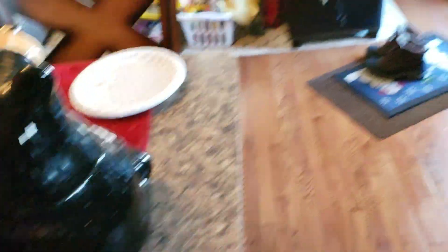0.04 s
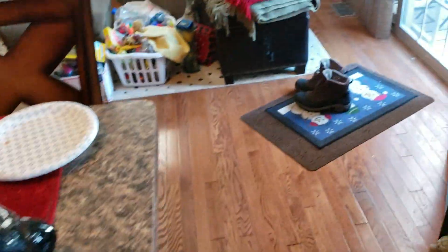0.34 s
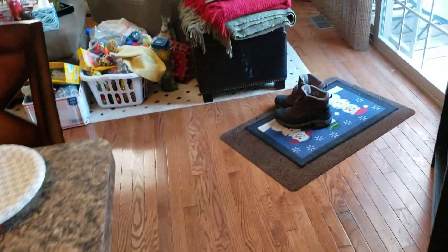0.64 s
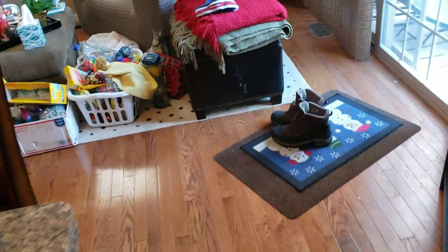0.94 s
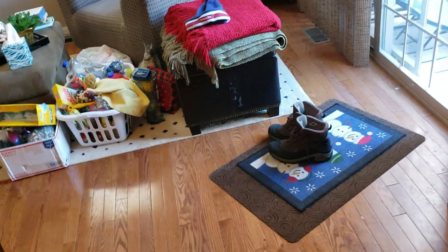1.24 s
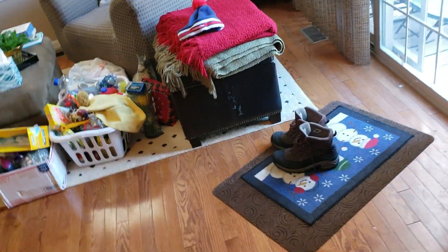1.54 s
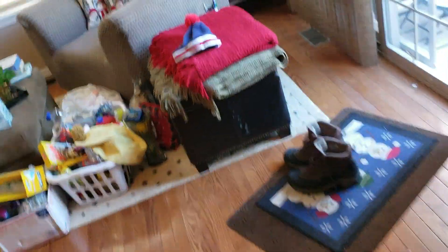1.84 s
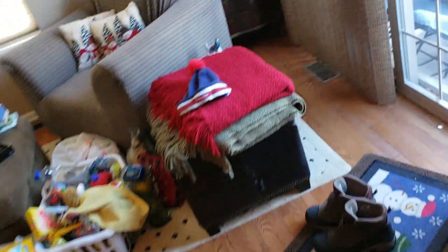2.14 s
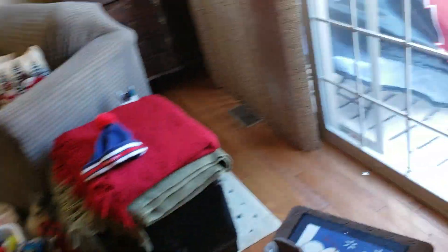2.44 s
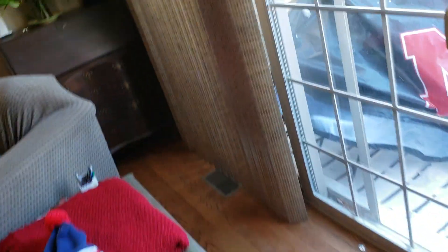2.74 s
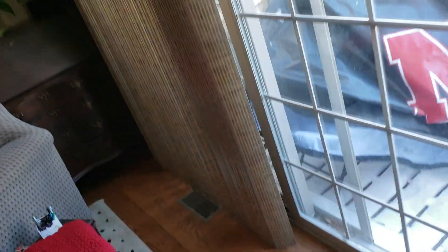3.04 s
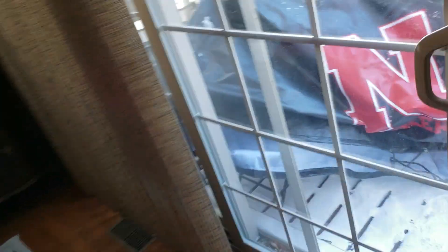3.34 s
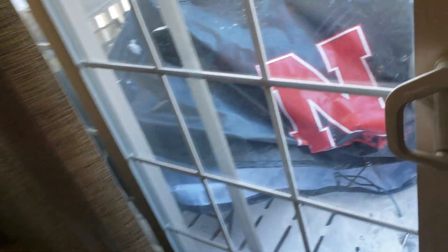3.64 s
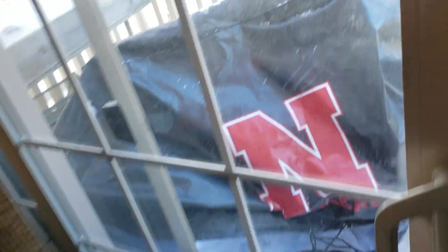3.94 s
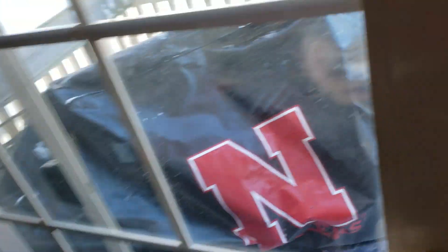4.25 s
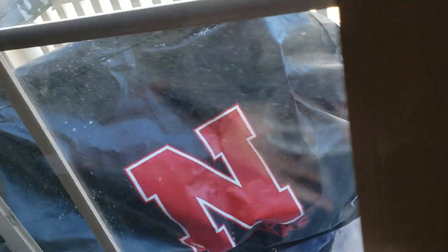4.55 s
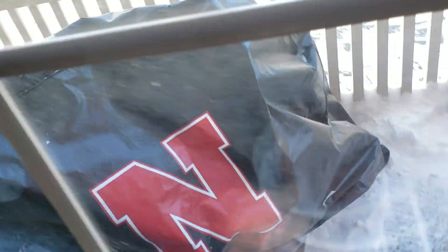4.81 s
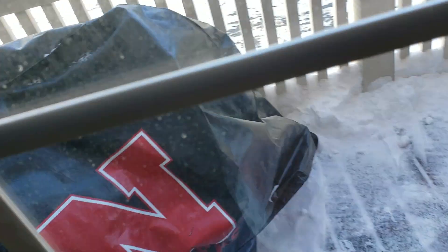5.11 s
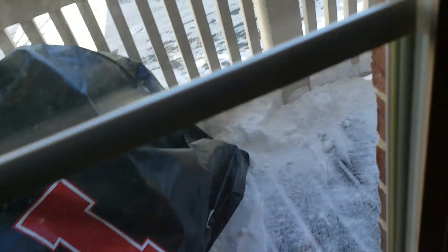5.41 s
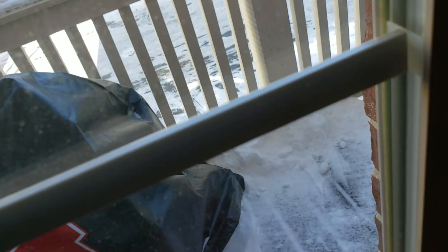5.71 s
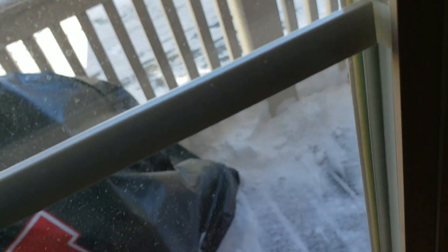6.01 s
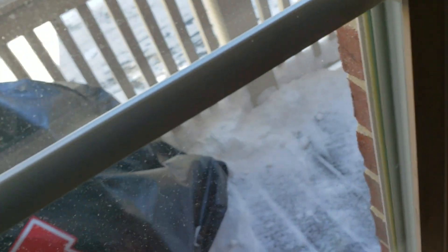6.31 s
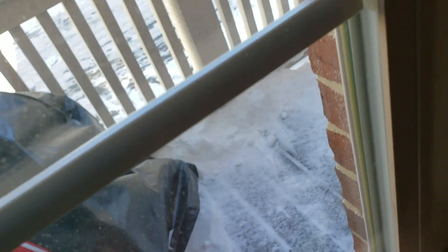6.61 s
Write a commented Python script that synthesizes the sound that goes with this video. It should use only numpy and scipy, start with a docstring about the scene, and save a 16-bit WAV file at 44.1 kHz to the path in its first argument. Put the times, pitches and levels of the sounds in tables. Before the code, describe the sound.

Someone walks over thumping floorboards in swishing clothes, tugs at a sliding glass door and opens it with a loud, stuttering rubber squeal.

```python
"""Opening a glass patio door

Someone in rustling clothes walks over a wooden kitchen floor, and the boards thump and knock.
At the door the latch clacks and scrapes, and after a few tugs the rollers start to rumble.
Close by on the left, the rubber weather seal sticks and slips along the frame: slow slips
judder, fast ones squeal."""
import sys
import numpy as np
from scipy import signal
from scipy.fft import rfft, irfft, next_fast_len
from scipy.io import wavfile
from scipy.ndimage import map_coordinates

SR = 44100
rng = np.random.default_rng(int(sys.argv[2]) if len(sys.argv) > 2 else 0)


def bounce(signal):
    """Save signal as a 16-bit WAV file at the path given by the first command-line argument."""
    frames = np.transpose(np.atleast_2d(signal))
    limited = np.clip(frames, -1, 1)
    pcm = np.round(limited * 32767).astype(np.int16)
    wavfile.write(sys.argv[1], SR, pcm)


N = 302922
TIME = np.arange(N) / SR
AGE = np.arange(SR // 2) / SR  # seconds since a short sound began

# how alike the left and right sides are: (frequency [Hz], likeness [0 to 1])
LIKENESS = [(60, 0.85), (250, 0.92), (700, 0.36), (1500, 0.017), (15000, 0.018)]
# the kitchen's echo: (frequency [Hz], time to fade by 60 dB [s])
ECHO_TIMES = [(80, 0.43), (400, 0.29), (2000, 0.27), (6000, 0.13), (15000, 0.13)]
# tone of the quiet house: (frequency [Hz], level [dB])
AIR_TONE = [(20, -9), (100, -6), (220, -19), (550, -25.5), (1000, -28), (2400, -27), (4800, -29.5),
            (7500, -32), (16000, -28.5)]

# fabric sliding on fabric: (peak time [s], length [s], swish [dB], hiss [dB], weave pitch [Hz])
FABRIC_STROKES = [(0.01, 0.2, -54, -61, 3990), (0.179, 0.11, -51.5, -61, 3830),
                  (0.285, 0.038, -43, -57.5, 3870), (0.37, 0.39, -63.5, -64.5, 4200),
                  (0.493, 0.1, -58.5, -69, 3480), (0.681, 0.11, -48, -60.5, 3700),
                  (0.83, 0.31, -62.5, -66, 4160), (0.96, 0.24, -54, -62, 3700),
                  (1.063, 0.13, -52.5, -60.5, 3750), (1.236, 0.13, -55, -67.5, 4250),
                  (1.469, 0.37, -88, -70, 4120), (1.727, 0.19, -67, -76.5, 4040),
                  (1.835, .24, -63.5, -72.5, 4430), (2.008, 0.28, -56, -66, 4630),
                  (2.089, 0.17, -64, -71, 4300), (2.43, 0.13, -60, -78, 3890),
                  (2.518, 0.15, -57, -75, 3740), (2.627, 0.25, -56, -67.5, 3850),
                  (2.821, 0.32, -59.5, -68, 3720), (3.194, 0.32, -67, -70.5, 3800),
                  (3.337, 0.37, -71.5, -69, 4500), (3.882, 0.27, -69.5, -72, 3760),
                  (4.066, 0.2, -79, -69.5, 4020), (5.07, 0.26, -70.5, -77, 3800),
                  (5.27, 0.37, -74.5, -72.5, 4600), (5.391, 0.36, -69, -66.5, 4510)]
# light brushing of the clothes between strokes: (time [s], level [dB])
BRUSH_LEVELS = [(0, -72.5), (1.4, -74), (1.68, -87), (2.35, -88), (2.95, -77), (3.3, -73), (3.6, -106),
                (5.5, -88)]
# tones of firmly and of lightly rubbed fabric: (frequency [Hz], level [dB])
SWISH_TONE = [(410, -43), (700, -29), (1080, -10.5), (2040, -1), (2220, -3), (3090, -2.5), (3870, 0.5),
              (5390, -3.5), (7590, -2.5), (9000, -42), (11700, -21), (19800, -120)]
HISS_TONE = [(350, -18), (600, -12), (1030, -6), (1330, -5), (2680, -20), (3160, -32), (4580, 0.5),
             (5710, -3.5), (7210, 3), (8620, -1), (14700, 2.5), (16000, -16.5)]

# heels and soles landing: (time [s], level [dB], thump pitch [Hz], treble cut-off [Hz])
STEPS = [(0.242, -58.5, 129.2, 453), (0.736, -50, 105.3, 606), (0.77, -53, 101.1, 450),
         (0.861, -48, 97, 910), (0.918, -41.5, 97, 2500), (1.885, -42.5, 117.5, 2400),
         (1.903, -42.5, 81.5, 600), (1.974, -45.5, 48, 2300), (2.636, -45.5, 110.3, 900),
         (2.698, -46.5, 56, 924), (2.75, -44, 53, 600), (3.274, -53, 128.3, 304), (3.341, -51.5, 48.7, 258),
         (3.528, -60, 99, 300), (3.85, -41, 92.8, 373), (3.937, -51, 81.8, 258), (4.002, -53.5, 80, 494),
         (4.738, -43, 93.4, 343)]
# tone of a knock on the floor or door: (frequency [Hz], level [dB])
KNOCK_TONE = [(30, -16.5), (60, -10), (110, 1), (165, 3.5), (255, -2), (380, -1), (520, -8.5), (700, -7.5),
              (1000, -14), (1800, -12.5), (3000, -12), (4500, -39)]
# small clicks of handled things and of the seal: (time [s], level [dB])
TICK_HITS = [(0.2776, -32.5), (0.28, -33.5), (0.282, -44), (0.288, -32), (0.5, -36.5), (0.653, -39),
             (1.191, -52), (6.171, -39), (6.2819, -14.5), (6.542, -11)]
# tone of those clicks: (frequency [Hz], level [dB])
TICK_TONE = [(300, -14), (900, -12.5), (1200, 5), (1600, -6.5), (3000, 0.5), (4000, -13), (5500, 0.5),
             (10000, -5.5), (16000, -5.5)]
# hard hits of boards, latch and door: (time [s], level [dB], pitch [Hz], time to fade by 60 dB [s])
CLACK_HITS = [(0.739, -39, 880, 0.039), (0.766, -48, 980, 0.024), (0.858, -42, 500, 0.038),
              (0.924, -25.5, 1130, 0.043), (0.945, -36, 2010, 0.026), (1.885, -38, 997, 0.015),
              (1.976, -28, 816, 0.023), (1.994, -35, 935, 0.019), (2.697, -40.5, 900, 0.028),
              (2.751, -28.5, 1260, 0.023), (4.739, -52.5, 910, 0.026), (4.802, -58, 900, 0.03),
              (4.855, -50, 900, 0.032), (5.609, -26, 2030, 0.0093), (5.62, -48, 2000, 0.053),
              (6.123, -29, 600, 0.033), (6.17, -29, 910, 0.026), (6.5519, -9.5, 961, 0.016)]
# soles rolling off the boards: (peak time [s], length [s], level [dB])
SOLE_SCUFFS = [(0.927, 0.18, -48), (1.06, .14, -65), (2.02, .2, -56.5), (2.824, .17, -53)]
# tone of a sole rubbing wood: (frequency [Hz], level [dB])
SOLE_TONE = [(300, -17), (700, -2), (1300, -10), (2200, -2), (2800, -5), (3800, -19), (8000, -22)]

# rubbing as the hand takes hold of the door: (time [s], level [dB])
HAND_LEVELS = [(4.73, -96), (4.738, -63), (4.776, -70.5), (5.042, -76.5), (5.074, -69), (5.182, -90),
               (5.392, -67.5), (5.522, -98), (5.56, -89)]
# hollow tone of that rubbing: (frequency [Hz], level [dB])
HAND_TONE = [(300, -11), (650, -5), (1050, 3), (1450, -7), (1950, -14), (2600, -24), (5000, -23)]
# pushes and tugs at the door: (time [s], level [dB], thump pitch [Hz], treble cut-off [Hz])
DOOR_TUGS = [(4.801, -59, 79.4, 560), (4.854, -53, 71.8, 650), (5.024, -53, 98.6, 319),
             (5.098, -54.5, 83, 287), (5.23, -57.5, 83, 255), (5.608, -47.5, 130, 2230),
             (5.714, -58.5, 135, 380), (5.803, -59.5, 66, 664), (5.864, -52, 83.2, 195),
             (6.071, -50, 127, 252), (6.122, -40.5, 100.3, 980), (6.169, -41, 85.7, 520),
             (6.232, -42, 127.4, 430), (6.552, -55, 60, 600)]
# pulls that rub the latch and fittings: (start [s], stop [s], level [dB], drift [dB/s], rise time [s])
LATCH_PULLS = [(5.587, 5.82, -54.5, -20.5, 0.024), (5.853, 5.913, -65.5, -60, 0.021),
               (6.091, 6.3, -52, -7, 0.11)]
# tone of the metal fittings: (frequency [Hz], level [dB])
METAL_TONE = [(700, -16), (1200, -14.5), (1700, -13), (2100, -6.5), (2600, -10.5), (3700, -9), (4700, 2.5),
              (5200, -3), (5800, -7.5), (7200, -3.5), (9400, -10.5), (14800, -7.5), (16000, -10.5)]

# two slides, the door sticking briefly in between; in each: (time [s], slip rate [Hz], pressure [dB])
DOOR_SLIDES = [
    [(6.283, 302, -27), (6.335, 332, -33), (6.374, 438, -31), (6.42, 293, -32), (6.446, 466, -31),
     (6.48, 233, -34.5), (6.517, 900, -28.5), (6.54, 946, -28), (6.57, 296, -37)],
    [(6.6, 284, -31), (6.612, 880, -32), (6.628, 1000, -28), (6.655, 490, -30.5), (6.684, 508, -32),
     (6.722, 1190, -26.5), (6.75, 1110, -27), (6.777, 1410, -29), (6.812, 1330, -33), (6.824, 980, -33.5),
     (6.85, 1380, -27.5), (6.87, 1520, -31)],
]
# tone of the dry rubbing under the squeal: (frequency [Hz], level [dB])
RASP_TONE = [(800, -37), (3000, -7), (6000, -0.5), (15000, 3.5)]
# notes at which the door panel rings: (frequency [Hz], width [Hz], strength [dB])
PANEL_NOTES = [(273, 94, -18), (646, 53, -0.5), (1080, 39, -18), (4440, 49, 5), (5860, 70, -7),
               (7100, 450, -23)]
# tone of the seal on the left and on the right: (frequency [Hz], level [dB])
SEAL_LEFT_TONE = [(60, -5), (280, -9), (450, -10), (620, 2.5), (1000, -2), (1300, -6), (1600, -0.5),
                  (2100, -2), (2800, -1), (4200, -2), (5200, -6.5), (7000, 1), (8500, -9), (13000, -4.5),
                  (15500, -10)]
SEAL_RIGHT_TONE = [(60, -8), (280, -9), (470, -10.5), (620, 1), (1000, 2), (1550, -1), (1900, 4),
                   (2500, -9.5), (3600, -5), (4700, -5.5), (6600, -7.5), (8400, -18.5), (11500, -7.5),
                   (15500, -15.5)]
# the rollers rumbling in their track: (time [s], level [dB])
ROLLER_LEVELS = [(6.3, -44), (6.31, -46), (6.476, -43), (6.518, -51), (6.662, -52.5), (6.74, -63)]
# tone of that rumble: (frequency [Hz], level [dB])
ROLLER_TONE = [(60, -25), (150, -18), (230, -6), (295, -1), (370, -10), (460, -26), (900, -25), (2000, -55)]


def amp(db):
    """Turn decibels into a number to multiply by."""
    return 10 ** (np.asarray(db) / 20)


def unit(x):
    """Scale a signal to an average (rms) strength of 1."""
    return x / np.sqrt(np.mean(x ** 2) + 1e-20)


def value_at(points, hz):
    """Read between the rows of a (frequency, value) table, on a log frequency scale."""
    frequencies, values = np.transpose(points)
    return np.interp(np.log(hz + 1), np.log(frequencies + 1), values)


def wobble(rate):
    """A smooth curve through `rate` random values a second."""
    return map_coordinates(rng.standard_normal(int(N * rate / SR) + 4), [TIME * rate])


def add(track, s, sound):
    """Mix a sound into a track, starting at s seconds."""
    part = track[..., max(round(s * SR), 0):][..., :sound.shape[-1]]
    part += sound[..., :part.shape[-1]]


def filtered(x, gain):
    """Scale each frequency by gain(hz), ringing only after a sound, never before (minimum phase)."""
    n = x.shape[-1]
    size = 2 * next_fast_len(n // 2 + 4096)
    gains = np.maximum(gain(np.fft.rfftfreq(size, 1 / SR)), 1e-6)
    cepstrum = irfft(np.log(gains))
    cepstrum[1:size // 2] *= 2
    cepstrum[size // 2 + 1:] = 0
    return irfft(rfft(x, size) * np.exp(rfft(cepstrum)), size)[..., :n]


def coloured(x, tone):
    """Give a sound the tone in a (frequency, level) table."""
    return filtered(x, lambda hz: amp(value_at(tone, hz)))


def stereo_noise(size):
    """White noise whose two sides are alike in the bass and unrelated in the treble."""
    likeness = np.clip(value_at(LIKENESS, np.fft.rfftfreq(size, 1 / SR)), -1, 1)
    angle = np.arccos(likeness) / 2
    mid, side = irfft(rfft(rng.standard_normal((2, size))) * [np.cos(angle), np.sin(angle)], size)
    return np.array([mid + side, mid - side])


def steady_noise(tone):
    """Stereo noise of strength 1 with the given tone, as long as the scene."""
    return unit(coloured(stereo_noise(N), tone))


def fade(fade_s):
    """A dying curve that is 60 dB down after fade_s seconds."""
    return np.exp(-np.log(1000) * AGE / max(fade_s, 1e-3))


def burst(fade_s):
    """A dying puff of noise with energy 1 on each side."""
    puff = stereo_noise(len(AGE)) * fade(fade_s)
    return puff / np.linalg.norm(puff, axis=1, keepdims=True)


def swell(peak_s, length_s, rise_share=0.35, edge_db=22.5):
    """Loudness of one stroke: a quick rise and a slower fall, edge_db below the peak at its ends."""
    offset = (TIME - peak_s) / length_s
    distance = np.maximum(-offset / rise_share, offset / (1 - rise_share))
    return amp(-edge_db * np.minimum(distance, 10))


def in_room(x, echo_db):
    """Add the kitchen's echo, in which the treble dies first."""
    hz, t, spectrum = signal.stft(stereo_noise(len(AGE)), SR, nperseg=256)
    decay = np.exp(-np.log(1000) * t / value_at(ECHO_TIMES, hz)[:, None])
    tail = signal.istft(spectrum * decay, SR, nperseg=256)[1]
    tail[:, :SR // 250] = 0  # the echo starts after 4 ms
    echo = signal.fftconvolve(x, tail / np.linalg.norm(tail[0]), axes=1)[:, :N]
    return x + amp(echo_db) * echo


def still_air():
    """The faint rumble and hiss of the house."""
    return amp(-69.0 + 0.38 * wobble(15)) * steady_noise(AIR_TONE)


def clothes():
    """Fabric on fabric: light touches hiss; in firm strokes the weave zips at a pitch set by its speed."""
    s, length_s, swish_db, hiss_db, weave_hz = np.transpose(FABRIC_STROKES)
    power = np.array([swell(*stroke) for stroke in zip(s, length_s)]) ** 2
    brush = amp(np.interp(TIME, *np.transpose(BRUSH_LEVELS)))
    swish_level = np.sqrt(amp(swish_db) ** 2 @ power + (amp(-1) * brush) ** 2)
    hiss_level = np.sqrt(amp(hiss_db) ** 2 @ power + brush ** 2)
    firmness = np.clip(20 * np.log10(swish_level / hiss_level) / 13, .25, .93)
    # slow noise smears the weave's pure note into a zip
    blur = filtered(stereo_noise(N), lambda hz: 1 / np.hypot(1, (hz / 480) ** 2.15))
    note = np.sin(2 * np.pi * np.cumsum(np.interp(TIME, s, weave_hz)) / SR)
    swish = firmness * unit(blur * note)
    swish += amp(2.5) * np.sqrt(1 - firmness ** 2) * steady_noise(SWISH_TONE)
    flicker = unit(amp(1.07 * wobble(350)))
    return flicker * (swish_level * swish + amp(5.5) * hiss_level * steady_noise(HISS_TONE))


def blows(rows, ring_s, hard_damping, thump_db, knock_db):
    """Each blow makes a low thump and a higher knock; soft blows are duller and thump more."""
    hard_hz, thump_swings = 464, 9.9  # cut-off of a half-hard blow; swings until the main thump dies
    thumps, knocks = np.zeros((2, N)), np.zeros((2, N))
    for s, db, thump_hz, cutoff_hz in rows:
        hardness = 1 / (1 + (hard_hz / cutoff_hz) ** 2)
        thump_shape = (fade(thump_swings / thump_hz) + 0.16 * fade(0.82)) * (1 - fade(0.028))
        thump = np.sin(2 * np.pi * thump_hz * AGE) * thump_shape
        add(thumps, s, amp(db + thump_db) * (1 - 0.85 * hardness) * thump)
        knock_gain = lambda hz: amp(value_at(KNOCK_TONE, hz)) / np.hypot(1, (hz / cutoff_hz) ** 3)
        shake = unit(filtered(stereo_noise(len(AGE)), knock_gain))
        ring = fade(ring_s * (hard_hz / cutoff_hz) ** hard_damping) + 0.54 * fade(0.037)
        add(knocks, s, amp(db + knock_db) * hardness * shake * ring * (1 - fade(0.0046)))
    return in_room(thumps, echo_db=-7) + in_room(knocks, echo_db=-13)


def footsteps():
    """Heels and soles land on the wooden floor and set it shaking."""
    return blows(STEPS, ring_s=0.41, hard_damping=0.075, thump_db=10.0, knock_db=-0.1)


def ticks():
    """Small bright clicks of handled things and of the seal, louder on the left."""
    out = np.zeros((2, N))
    for s, db in TICK_HITS:
        click = burst(fade_s=0.0099)
        click[:, 0] += .6  # the sharp first touch
        click = coloured(click, TICK_TONE)
        add(out, s, amp(db + 3.5) * click / np.abs(click).max())
    return in_room(out, echo_db=-4.5) * amp([[2], [-2]])


def clacks():
    """Boards, latch and door take hard hits, each ringing briefly around one rough pitch."""
    out = np.zeros((2, N))
    for s, db, pitch_hz, fade_s in CLACK_HITS:
        hit = burst(fade_s)
        hit[:, 0] += .8  # the sharp first push
        resonance = lambda hz: 1 / np.hypot(1, 1.2 * (hz / pitch_hz - pitch_hz / (hz + 1)))
        ring = filtered(hit, lambda hz: resonance(hz) / np.hypot(1, (hz / 2500) ** 5))
        add(out, s, amp(db - 5.0) * ring / np.abs(ring).max())
    return in_room(out, echo_db=-7.5)


def scuffs():
    """A sole rubs grittily on the wood as it rolls off."""
    level = sum(amp(db) * swell(s, length_s) for s, length_s, db in SOLE_SCUFFS)
    grit = unit(amp(2.3 * wobble(300)))
    return level * grit * steady_noise(SOLE_TONE)


def hand_rub():
    """The hand takes hold of the door with an uneven, hollow rubbing."""
    s, db = np.transpose(HAND_LEVELS)
    touching = (TIME > s[0]) & (TIME < s[-1])
    level = amp(np.interp(TIME, s, db) + 2.0 + 1.3 * wobble(81))
    return touching * level * steady_noise(HAND_TONE)


def door_tugs():
    """The hand pushes and tugs at the door; the sharper the blow, the sooner its knock dies."""
    return blows(DOOR_TUGS, ring_s=0.51, hard_damping=1.0, thump_db=9, knock_db=2.0)


def latch_scrape(release_s=0.019):
    """Dry metal fittings rub together: each pull catches, drifts in level and lets go."""
    level = np.zeros(N)
    for start, stop, db, db_per_s, rise_s in LATCH_PULLS:
        held_s = np.clip(TIME - start, 0, stop - start)
        catch = np.minimum(held_s / rise_s, 1) ** 2
        release = np.exp(-np.maximum(TIME - stop, 0) / release_s)
        level += amp(db + db_per_s * held_s) * catch * release
    return amp(1.66 + 1.7 * wobble(200)) * level * steady_noise(METAL_TONE)


def rubber_slips(jitter, scatter_db):
    """One snap each time the rubber lets go; slow slips are uneven, fast ones lock into a squeal."""
    s, slip_hz, pressure_db = np.vstack(DOOR_SLIDES).T
    rate = np.interp(TIME, s, slip_hz)
    looseness = np.minimum(300 / rate, 1)
    uneven_rate = rate * (1 + jitter * looseness * wobble(400)).clip(.1)
    cycles = np.cumsum(uneven_rate * (TIME >= s[0])) / SR
    positions = np.interp(np.arange(int(cycles[-1])) + 1e-6, cycles, np.arange(N))  # one per cycle
    samples = positions.astype(int)
    sliding = sum((TIME >= slide[0][0]) & (TIME < slide[-1][0]) for slide in DOOR_SLIDES)
    pressure = sliding * amp(np.interp(TIME, s, pressure_db))
    scatter = amp(scatter_db * looseness[samples] * rng.standard_normal(len(samples)))
    sizes = (pressure * np.sqrt(SR / rate))[samples] * scatter
    # spread each snap over 16 samples so that it can fall between two of them
    nearby = samples[:, None] + np.arange(-7, 9)
    lag = nearby - positions[:, None]
    snaps = sizes[:, None] * np.sinc(lag) * np.cos(np.pi * lag / 16) ** 2
    return np.bincount(nearby.ravel(), snaps.ravel(), N)[:N], pressure, rate


def seal_paths(friction, places):
    """Each slip arrives directly and, mostly in the treble, by bounces that change as the door moves."""
    out = np.zeros((2, N))
    place_times = np.linspace(DOOR_SLIDES[0][0][0], TIME[-1], places)
    first = int(place_times[0] * SR) - SR // 100
    start_s, friction = first / SR, friction[first:]
    for weights in np.eye(places):  # blend from each place's bounces into the next
        bounces = coloured(burst(fade_s=0.026), [(300, -3.5), (1500, 0), (4000, 0)])
        share = np.sqrt(np.interp(TIME[first:], place_times, weights))
        add(out, start_s, signal.fftconvolve((share * friction)[None], bounces, axes=1))
    # the direct sound reaches the right side a little later and weaker
    add(out[0], start_s, coloured(friction, [(400, 1), (1500, -8), (4000, -2.5)]))
    add(out[1], start_s + 0.00021, coloured(friction, [(400, 0.0), (1500, -8), (4000, -7.5)]))
    return out


def weather_seal():
    """The snaps and dry rubbing of the rubber seal ring through the door panel."""
    snaps, pressure, rate = rubber_slips(jitter=0.0515, scatter_db=1.5)
    roughness = 0.61 * np.minimum(580 / rate, 1) ** 1.45 * rng.standard_normal(N)
    rasp = amp(-7) * coloured(rng.standard_normal(N), RASP_TONE)
    friction = snaps + pressure * (roughness + rasp)
    # the rubber stretches again over each cycle, so little is left below the slip rate
    total, n, period = np.cumsum(friction), np.arange(N), SR / rate
    cycle_average = (np.interp(n + period / 2, n, total) - np.interp(n - period / 2, n, total)) / period
    panel_gain = lambda hz: 1 + sum(
        amp(db) / (1 + (2 * (hz - centre) / width) ** 2) for centre, width, db in PANEL_NOTES)
    left, right = filtered(seal_paths(friction - cycle_average, places=9), panel_gain)
    sound = np.array([coloured(left, SEAL_LEFT_TONE), coloured(right, SEAL_RIGHT_TONE)])
    return amp(1.1) * in_room(sound * np.std(pressure) / np.std(sound), echo_db=-9.0)


def rollers():
    """The rollers rumble near the panel's lowest note as the door gets under way."""
    s, db = np.transpose(ROLLER_LEVELS)
    rolling = (TIME > s[0]) & (TIME < s[-1])
    return rolling * amp(np.interp(TIME, s, db) - 0.5) * steady_noise(ROLLER_TONE)


def scene():
    """Everything heard in the kitchen."""
    hits = footsteps() + door_tugs() + clacks() + ticks()
    rubbing = scuffs() + clothes() + hand_rub() + latch_scrape()
    return hits + rubbing + rollers() + weather_seal() + still_air()


def record(dry):
    """Cut away the very highest treble."""
    top_hz = 15950
    size = next_fast_len(N + SR // 2)
    kept = np.fft.rfftfreq(size, 1 / SR) < top_hz
    return irfft(rfft(dry, size) * kept, size)[:, :N]


dry = scene()
out = record(dry)
bounce(out)
```